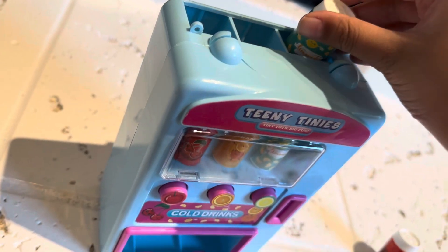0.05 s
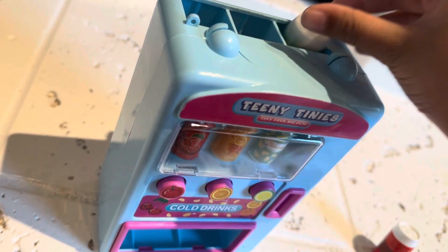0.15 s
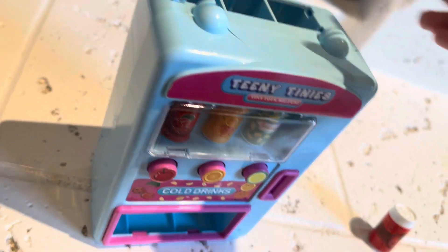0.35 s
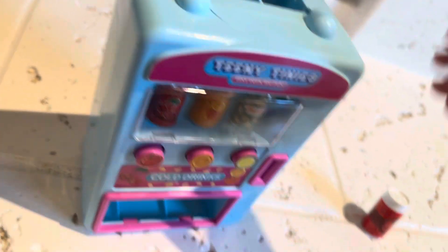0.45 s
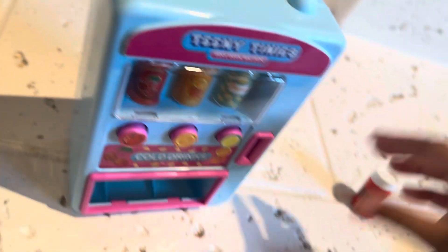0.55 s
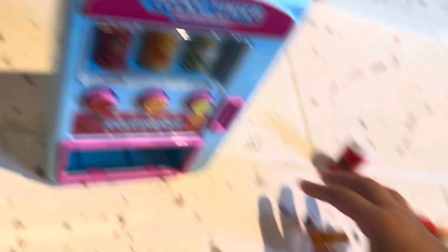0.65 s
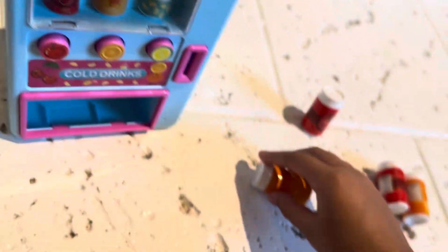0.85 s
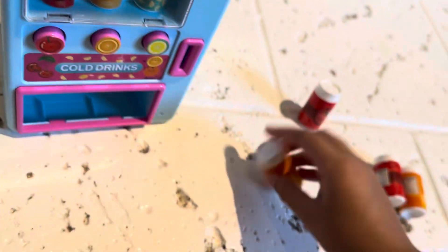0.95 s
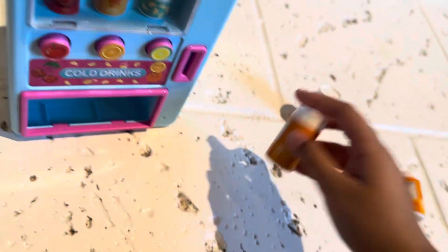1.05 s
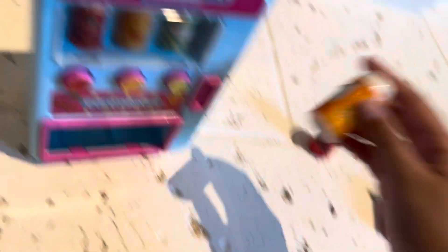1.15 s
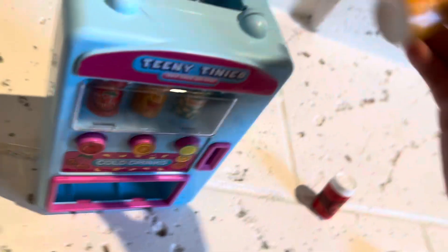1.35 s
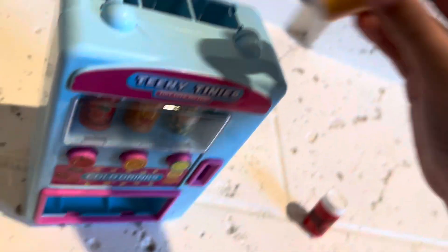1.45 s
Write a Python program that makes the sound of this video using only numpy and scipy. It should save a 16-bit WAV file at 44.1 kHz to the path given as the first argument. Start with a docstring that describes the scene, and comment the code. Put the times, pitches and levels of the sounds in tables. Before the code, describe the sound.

Plastic can dropping and bouncing through a hollow toy, followed by faint taps on a table.

```python
"""Can drop in a toy vending machine

Close to the microphone, a small plastic can is pushed into the top of the toy, drops down its chute
and bounces to rest. Each contact ticks, rings the can and booms the hollow cabinet. Then a hand picks
another can off the table: light clicks, a few rocking taps and a faint sleeve rustle.
Behind it all is a live room with a low rumble."""
import sys
import numpy as np
from scipy import signal
from scipy.fft import rfft, irfft
from scipy.io import wavfile

SR = 44100
rng = np.random.default_rng(int(sys.argv[2]) if len(sys.argv) > 2 else 0)


def unload_wav(signal):
    """Save mono or channel-first audio to the path in sys.argv[1] as 16-bit WAV at rate SR, clipped to [-1, 1]."""
    wavfile.write(
        sys.argv[1],
        SR,
        np.round(np.clip(np.atleast_2d(signal).T, -1, 1) * 32767).astype(np.int16),
    )


N = 66150

# Room tone, rumble and hiss. Each row: frequency in Hz, relative density in dB.
ROOM_TONE_SPECTRUM = [(20, -31), (38, -12.5), (54, 4.5), (70, -5), (95, 5), (135, -2.5), (172, 3.5),
                      (205, -14), (250, -5.5), (350, -20), (600, -29), (900, -39), (1300, -35), (2300, -37),
                      (4000, -49.5), (7500, -47), (10500, -74.5), (16000, -64.5)]
ROOM_TONE_DB, ROOM_TONE_SIDE_DB = -42, -15.5
# The live room. Each row: frequency in Hz, tail in dB, tail t60 in seconds, early reflections in dB.
REVERB_BANDS = [(148, -39.5, 0.72, -33.5), (400, -22.5, 0.94, -30.5), (900, -20, 1, -10.5),
                (1800, -21.5, 1, -21.5), (4000, -17.5, 1, -16), (8000, -22.5, 0.54, -21),
                (15000, -37.5, .35, -28)]
REVERB_BUILD_S, EARLY_T60_S = 0.019, 0.044
# The two microphone ports. Each row: frequency in Hz, left minus right level in dB.
PORT_BALANCE = [(300, -1.5), (700, 1.5), (1200, 3.5), (2200, 0.5), (4400, 4), (8000, 4), (15000, -2)]
# Each row: frequency in Hz, phase lead of the left port in radians.
PORT_LEAD = [(100, 0.18), (400, 0.19), (1000, 0.7), (1900, 0.65), (2800, 1.2), (4600, 0.92), (6300, 1.4),
             (7200, 1.6), (8500, 0.85), (10000, 1.3), (16000, 1.08)]

# The arm reaches, then lifts. Each row: start in seconds, end in seconds, level in dB.
ARM_MOVES = [(0.584, 0.818, -63.5), (1.105, 1.534, -68.5)]
# Sleeve cloth. Each row: frequency in Hz, relative density in dB.
SLEEVE_SPECTRUM = [(800, -31), (2200, -3), (3300, 2.5), (4800, 2.5), (7000, 0), (9000, 2), (11000, -19.5),
                   (14500, -15), (16500, -22)]
SLEEVE_ATTACK_S, SLEEVE_RELEASE_S = 0.015, 0.075

# A finger meets the can. Each row: start in seconds, level in dB, pitch factor, click centre in Hz.
FINGER_CLICKS = [(0.8929, -34, 0.99, 3380), (1.0838, -44.5, 0.897, 2030), (1.451, -55, 0.71, 1710)]
# The touched can and the table. Each row: frequency in Hz, relative level in dB, t60 in seconds.
CLICK_MODES = [(1330, 3.5, 0.023), (2360, 6, 0.012), (3620, 1.5, 0.0095), (4266, -7, 0.011),
               (4570, -11.5, 0.016)]
TABLE_MODES = [(111, 6, 0.17), (125, 2.5, 0.078), (260.5, -7.5, 0.12)]
# The can rocks on the table. Each row: start in seconds, thud in dB, tick in dB.
ROCKING_TAPS = [(0.913, -46, -70), (1.1059, -32.5, -47), (1.1290, -32.5, -53), (1.1493, -36.5, -46.5),
                (1.1655, -37.5, -54), (1.1995, -39, -75), (1.2255, -36.5, -56), (1.2445, -39.5, -55)]
# The tick of a tap. Each row: frequency in Hz, relative density in dB.
TAP_TICK_SPECTRUM = [(1000, -29.5), (3000, -15.5), (5000, -7.5), (7800, 6), (9000, -9.5), (11000, -35),
                     (16000, -30)]
CHIRP_HIGH_HZ, CHIRP_LOW_HZ, CHIRP_GLIDE_S, CHIRP_DETUNE = 860, 226, 0.0045, 0.025
EDGE_ECHO_S, EDGE_ECHO_DB = 0.00832, -11.5  # each chirp comes back from the edge of the table

# The can hits the chute. Each row: start in seconds, cabinet boom in dB, wall knock in dB,
# can clack in dB, tick in dB, ring length factor, clack centre in Hz.
CHUTE_CONTACTS = [ (0.0827, -35, -33, -31.5, -44.5, 0.87, 1630), (0.093, -39, -42.5, -46.5, -76, 1.6, 1650),
                  (0.1473, -34.5, -23, -29, -38, 0.5, 1984), (0.1531, -24, -22, -20.5, -52, 0.51, 1810),
                  (0.1972, -24.5, -19.5, -38.5, -30.5, 0.4, 3130),
                  (0.2168, -26.5, -20, -18.5, -34, 0.58, 1800), (0.2294, -6.5, -3.5, -1, -11.5, 0.65, 2450),
                  (0.234, -7.5, -12, -17.5, -19, 1, 1900), (0.2410, -6.5, -10.5, -22, -47, 0.65, 2000),
                  (0.2491, -19.5, -27.5, -23.5, -26, 0.46, 2430),
                  (0.2803, -24.5, -20, -19.5, -13.5, 0.82, 3500), (0.2833, -47, -2, -24, -16, 0.35, 2000),
                  (0.288, -9.5, -20, -19.5, -39, 0.89, 2800), (0.3205, -25, -31.5, -56, -40, 1.0, 2500),
                  (0.3816, -15.5, -8, -8, -33, 0.78, 2140), (0.383, -9, -3.5, -11.5, -19.5, 0.36, 5400),
                  (0.3960, -14, -25, -17, -18, 1.0, 2810), (0.4087, -19, -22, -44, -37, 1.0, 2000),
                  (0.4183, -13.5, -30, -55, -36, 0.9, 2000), (0.424, -39, -13.5, -29, -30, 0.39, 2000),
                  (0.4320, -23, -32, -24.5, -41, 0.7, 2010), ]
# The can lands with its full weight and damps the panel it hits. Each row: start in seconds, level in dB.
LANDINGS = [(0.2359, -6), (0.2818, 10.5), (0.3832, -1.5)]
# The hollow cabinet, its walls, the falling can and the damped panel.
# Each row: frequency in Hz, relative level in dB, t60 in seconds.
CABINET_MODES = [(324, -9, 0.019), (395.9, 7.5, 0.11), (407, -6.5, 0.028), (507.3, 13.5, 0.054),
                 (559.4, -0.5, 0.12), (600, -16, 0.021)]
WALL_MODES = [(814.7, -3.5, 0.077), (971.4, -4, 0.086), (1008, 0.5, 0.035), (1169, 3, 0.036),
              (1338, -0.5, 0.069), (1512, -5, .05)]
CAN_MODES = [(1628, 1, .04), (1932, 6, 0.017), (2234, -3, 0.021), (2368, 2, 0.018), (2603, -4, 0.03),
             (3020, -10, 0.042), (3380, -10, 0.033), (3545, -9, .03), (3670, -20.5, .03),
             (4270, -9.5, 0.023), (4880, -10, 0.05), (5270, -4.5, 0.028), (6480, -39, 0.025)]
DAMPED_PANEL_MODES = [(334, -5.5, 0.018), (388.3, -1, 0.021), (553, -3.5, 0.023), (987, 1.5, 0.017),
                      (1154, -2.5, 0.016)]
# Dense upper modes, heard as a tick. Each row: frequency in Hz, relative density in dB.
CHUTE_TICK_SPECTRUM = [(600, 3.5), (1500, 15), (3000, 8.5), (4200, 3), (5500, 0.5), (7300, -2), (8500, -4),
                       (10000, -7), (11300, -46), (12500, -12), (15000, -12.5), (16500, -35)]
RADIATE_HZ = 246  # the small cabinet radiates little below this
NOTCH_HZ, NOTCH_Q = 705, 5.5  # the cavity and its walls cancel each other here

MODE_SCATTER_DB, MODE_DETUNE = 2.67, 0.003
BEND_LAG_S = 0.0008  # travel time of a bending wave at 1 kHz
FOCUS_DB_PER_OCT = 9  # the point of contact favours the modes near the centre of a clack or click


def undb(db):
    """Decibels to gain."""
    return 10 ** (np.asarray(db) / 20)


def at(points, hz, column=1):
    """Read a column of a table on a log-frequency axis."""
    rows = np.array(points, float)
    return np.interp(np.log(np.maximum(hz, 1)), np.log(rows[:, 0]), rows[:, column])


def noise(spectrum):
    """Noise of rms 1 with the given spectrum."""
    gain = undb(at(spectrum, np.fft.rfftfreq(N, 1 / SR)))
    x = irfft(rfft(rng.standard_normal(N)) * gain, N)
    return x / x.std()


def fade(t, t60):
    """Exponential decay, 60 dB down after t60 seconds."""
    return np.exp(-np.log(1000) * t / t60)


def swell(t, rise_s):
    """Smooth onset from 0 to 1."""
    return 1 - np.exp(-(t / rise_s) ** 2)


def add(out, start, x):
    """Mix a sound in at its start in seconds."""
    i = int(start * SR)
    out[i:i + len(x)] += x[:N - i]


def ring(modes, t, rise_s, length=1, pitch=1, focus_hz=None):
    """Damped modes, a little different on each blow; low bending waves arrive later."""
    hz, db, t60 = np.array(modes, float).T[:, :, None]
    scatter, detune = rng.standard_normal((2, len(modes), 1))
    if focus_hz:
        db = db - FOCUS_DB_PER_OCT * abs(np.log2(hz / focus_hz))
    age = np.maximum(t - BEND_LAG_S * np.sqrt(1000 / hz), 0)
    gain = undb(db + MODE_SCATTER_DB * scatter)
    waves = np.sin(2 * np.pi * hz * pitch * (1 + MODE_DETUNE * detune) * age)
    envelope = swell(age, rise_s) * fade(age, t60 * length)
    return (gain * waves * envelope).sum(0) / np.linalg.norm(gain)


def room_tone():
    """Steady background: both microphone ports share the rumble, but not the hiss."""
    hz = np.fft.rfftfreq(N, 1 / SR)
    width = np.minimum(undb(ROOM_TONE_SIDE_DB) * np.hypot(1, hz / 200), 1)
    side = irfft(rfft(noise(ROOM_TONE_SPECTRUM)) * width, N)
    return undb(ROOM_TONE_DB) * (noise(ROOM_TONE_SPECTRUM) + np.array([side, -side]))


def room_reverb(x):
    """The room answers with early reflections and a diffuse tail, wider towards the treble."""
    t, hz = np.arange(N) / SR, np.maximum(np.fft.rfftfreq(N, 1 / SR), 1)
    white, response = rfft(rng.standard_normal((2, N))), 0
    for centre_hz in 125 * 2. ** np.arange(8):
        octave = np.maximum(1 - abs(np.log2(hz / centre_hz)), 0)
        mid, side = irfft(white * octave, N)
        tail = swell(t, REVERB_BUILD_S) * fade(t, at(REVERB_BANDS, centre_hz, column=2))
        tail *= undb(at(REVERB_BANDS, centre_hz)) / np.linalg.norm(tail)
        early = swell(t, REVERB_BUILD_S / 2) * fade(t, EARLY_T60_S)
        early *= undb(at(REVERB_BANDS, centre_hz, column=3)) / np.linalg.norm(early)
        width = min(centre_hz / 1500, 1)
        response = response + np.hypot(tail, early) * (mid + width * np.array([side, -side]))
    return signal.fftconvolve(x[None], response, axes=1)[:, :N]


def microphone_ports(x):
    """Direct sound from close by reaches each port with its own level and phase."""
    hz = np.fft.rfftfreq(N, 1 / SR)
    left = undb(at(PORT_BALANCE, hz) / 2) * np.exp(.5j * at(PORT_LEAD, hz))
    return irfft(rfft(x) * np.array([left, 1 / left]), N)


def sleeve_rustle():
    """Cloth hisses softly while the arm moves."""
    t, level = np.arange(N) / SR, 0
    for start, end, db in ARM_MOVES:
        attack = np.clip((t - start) / SLEEVE_ATTACK_S, 0, 1)
        release = np.clip((end - t) / SLEEVE_RELEASE_S, 0, 1)
        level = level + undb(db) * attack * release
    return level * np.array([noise(SLEEVE_SPECTRUM), noise(SLEEVE_SPECTRUM)])


def can_on_table():
    """A finger clicks on a can; its rocking taps cross the table as falling chirps and a low boom."""
    out, t = np.zeros(N), np.arange(SR // 10) / SR
    for start, db, pitch, focus_hz in FINGER_CLICKS:
        add(out, start, undb(db) * ring(CLICK_MODES, t, rise_s=0.00052, pitch=pitch, focus_hz=focus_hz))
    glide_hz = CHIRP_LOW_HZ + (CHIRP_HIGH_HZ - CHIRP_LOW_HZ) * np.exp(-t / CHIRP_GLIDE_S)
    for start, thud_db, tick_db in ROCKING_TAPS:
        hz = glide_hz * (1 + CHIRP_DETUNE * rng.standard_normal())
        chirp = np.sin(2 * np.pi * np.cumsum(hz) / SR) * swell(t, rise_s=0.0018) * fade(t, t60=0.051)
        boom = ring(TABLE_MODES, t, rise_s=0.004)
        tick = fade(t, t60=0.0078) * noise(TAP_TICK_SPECTRUM)[:len(t)]
        add(out, start, undb(thud_db) * (chirp + boom) + undb(tick_db) * tick)
        add(out, start + EDGE_ECHO_S, undb(thud_db + EDGE_ECHO_DB) * chirp)
    return out


def falling_can():
    """Each contact in the chute sets cabinet, walls and can ringing; heavy landings add a dry thud."""
    out, t = np.zeros(N), np.arange(SR // 5) / SR
    tick_envelope = swell(t, rise_s=0.0003) * (fade(t, t60=0.016) + undb(-24.5) * fade(t, t60=0.06))
    for start, boom_db, knock_db, clack_db, tick_db, length, focus_hz in CHUTE_CONTACTS:
        boom = undb(boom_db) * ring(CABINET_MODES, t, rise_s=0.0025, length=length)
        knock = undb(knock_db) * ring(WALL_MODES, t, rise_s=0.0011, length=length)
        clack = undb(clack_db) * ring(CAN_MODES, t, rise_s=0.0005, length=length, focus_hz=focus_hz)
        tick = undb(tick_db) * tick_envelope * noise(CHUTE_TICK_SPECTRUM)[:len(t)]
        add(out, start, boom + knock + clack + tick)
    for start, db in LANDINGS:
        add(out, start, undb(db) * ring(DAMPED_PANEL_MODES, t, rise_s=0.003))
    notched = signal.lfilter(*signal.iirnotch(NOTCH_HZ, NOTCH_Q, fs=SR), out)
    return signal.sosfilt(signal.butter(2, RADIATE_HZ, "high", fs=SR, output="sos"), notched)


def scene():
    """The toy and the hand close to the microphone, the live room behind them."""
    near = falling_can() + can_on_table()
    return microphone_ports(near) + room_reverb(near) + sleeve_rustle() + room_tone()


def record(dry):
    """The phone cuts the treble above 16.4 kHz."""
    return signal.sosfilt(signal.ellip(8, .2, 70, 16400, fs=SR, output="sos"), dry)


dry = scene()
out = record(dry)
unload_wav(out)
```